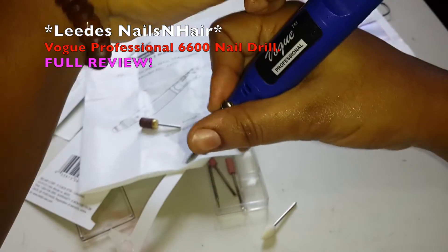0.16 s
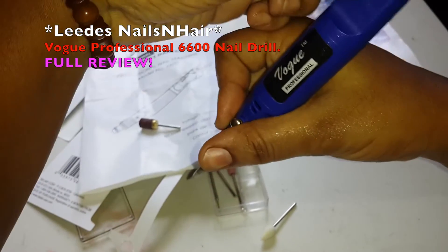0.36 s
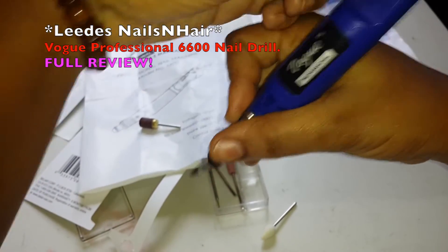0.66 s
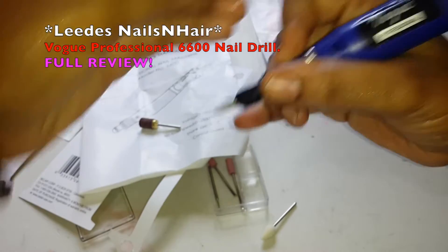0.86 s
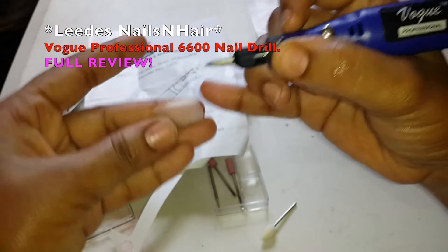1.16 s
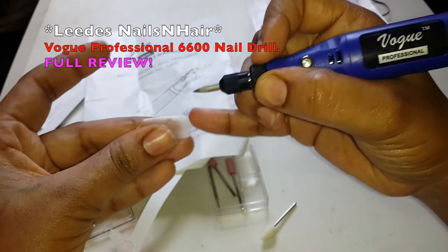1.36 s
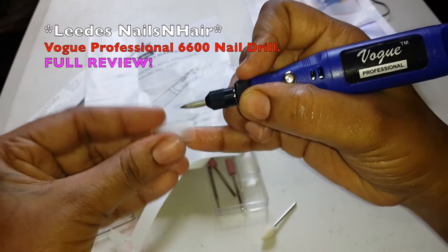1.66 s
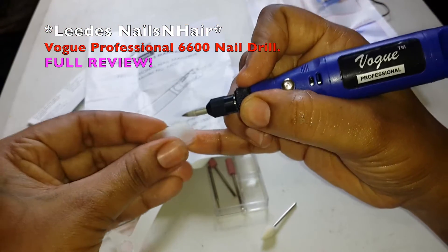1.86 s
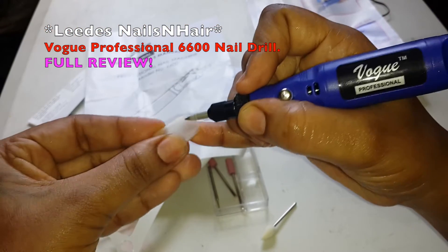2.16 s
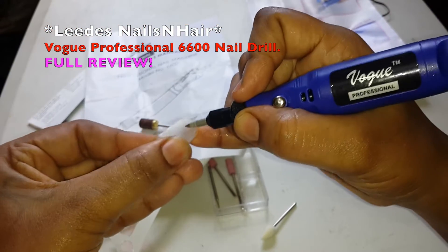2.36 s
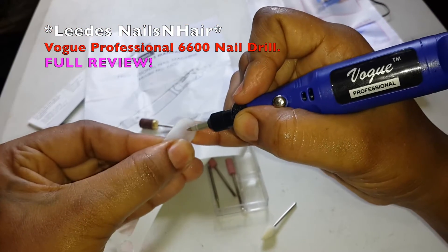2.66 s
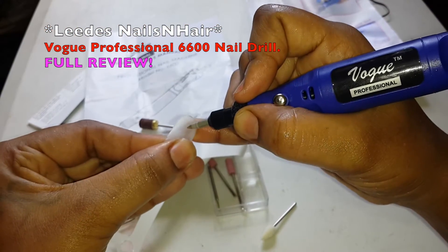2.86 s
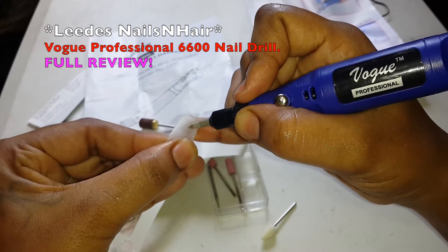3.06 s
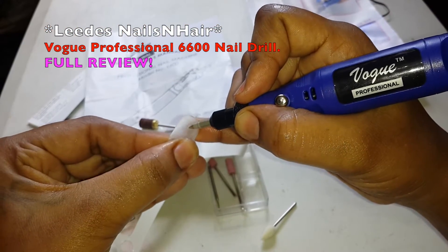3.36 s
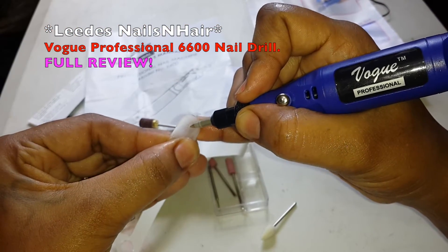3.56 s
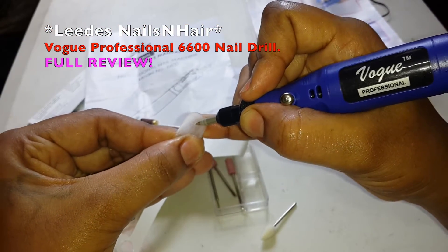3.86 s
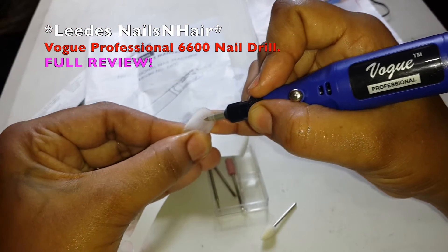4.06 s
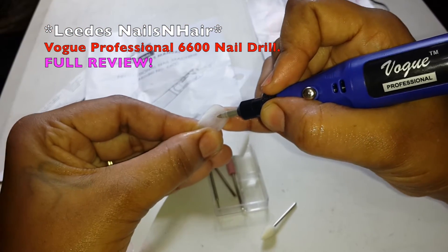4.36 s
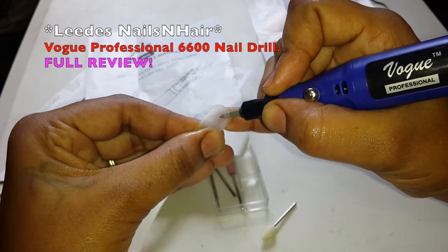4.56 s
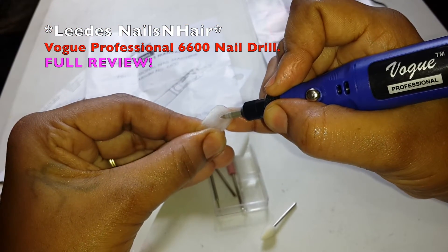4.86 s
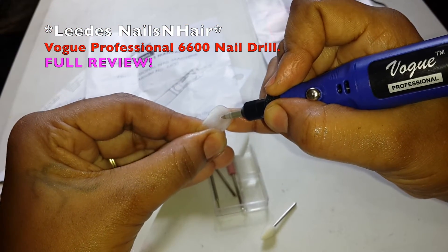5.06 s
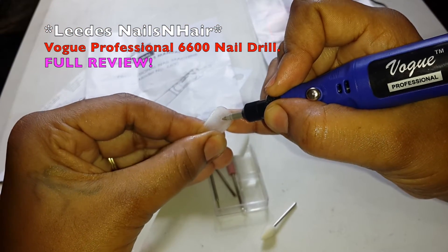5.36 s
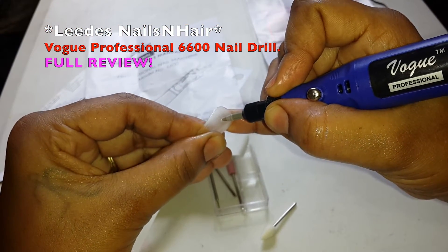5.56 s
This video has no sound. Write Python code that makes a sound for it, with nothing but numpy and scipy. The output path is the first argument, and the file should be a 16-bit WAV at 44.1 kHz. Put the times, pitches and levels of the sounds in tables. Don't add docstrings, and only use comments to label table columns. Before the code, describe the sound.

A small electric nail drill held close to the microphone in a quiet room. It starts as a low, weak plastic buzz, swoops up in pitch after half a second, and then runs steadily as a loud, bright, raspy whine. The loose chuck chatters in uneven bursts with a metallic ring as the bit grinds a plastic nail tip. Stereo, slightly to the right, with very little bass.

```python
import sys
import numpy as np
from scipy import signal
from scipy.fft import rfft, irfft, next_fast_len
from scipy.io import wavfile
from scipy.ndimage import map_coordinates

SR = 44100
rng = np.random.default_rng(int(sys.argv[2]) if len(sys.argv) > 2 else 0)


def amplitude_ratio(level_db):
    exponent = np.asarray(level_db, float) / 20
    return 10 ** exponent


def materialize(psi):
    bounded = np.clip(np.atleast_2d(psi).T, -1, 1)
    quanta = np.round(bounded * 32767).astype(np.int16)
    wavfile.write(sys.argv[1], SR, quanta)


N = 251370
T = np.arange(N) / SR

# (t/s, f/Hz)
SHAFT_SPEED = [(0, 65.45), (.47, 65.45), (.55, 78.8), (.6, 87.2), (.65, 91.3), (.75, 95.8), (.85, 102),
               (.9, 102.25), (3.1, 102.25), (3.5, 101.8), (3.9, 101.2), (4.9, 101.22), (5.7, 101.07)]
# (t/s, left-right level/dB)
HAND_PLACE = [(0.0, -4), (0.24, -2), (1.17, -4.5), (2.14, -2.5), (2.43, -4), (3.25, -5), (3.78, -5.5),
              (4.65, -6), (4.9, -5.5), (5.7, -5.5)]
# (slow level/dB, fast level/dB, change at full pressure/dB)
RATTLE_DB, TIP_DB = (-35.5, -29.5, -0.51), (-67, -37, -19)
# (start t/s, length t/s, bit tip level/dB, chuck level/dB)
HARD_SPELLS = [(0.335, 0.22, -34, -40), (0.625, 0.32, -34.5, -35), (0.916, 0.14, -35, -15),
               (1.097, 0.21, -32, -47), (1.353, 0.1, -31, -13), (1.67, 0.46, -38, -22),
               (2.14, 0.047, -34, -28), (2.184, 0.3, -32, -9.5), (2.57, 0.033, -31.5, -8),
               (2.618, 0.18, -30, -10.5), (2.793, 0.055, -36, -30), (3.055, 0.076, -31, -8),
               (3.284, 0.053, -41, -16), (3.38, 0.072, -32, -10), (3.611, 0.137, -27.5, -11),
               (3.777, 0.15, -28.5, -11.5), (4.016, 0.091, -27.5, -35), (4.15, 0.13, -25, -31),
               (4.32, 0.12, -26.5, -37), (4.482, 0.054, -27, -44), (4.577, 0.11, -38, -40),
               (5.56, 0.072, -34, -16)]


def drill():
    shaft_hz = curves(SHAFT_SPEED)[0]
    rattle_db = state(*RATTLE_DB) + 0.32 * wobble(8, T)
    tip_db = spells(state(*TIP_DB) + wobble(9.1, T), HARD_SPELLS)
    tied = housing_rattle(shaft_hz, rattle_db) + chuck_knocks(shaft_hz)
    tied = tied + bit_knocks(shaft_hz, tip_db) + sleeve_knocks(shaft_hz)
    hiss_db = rattle_db + 0.019 * (tip_db + 65) + 2.5
    tied = tied + amplitude_ratio(hiss_db) * brush_hiss(shaft_hz)
    return tied * amplitude_ratio(np.outer([.5, -.5], curves(HAND_PLACE)[0] + 4.5))


# (f/Hz, width f/Hz, level/dB)
HOUSING_MODES = [(1375, 189, 8.5), (1903, 370, 2.5), (2126, 116, 7), (2410, 400, 1), (2934, 1090, -2),
                 (3630, 415, 0), (4360, 840, -4.5), (5950, 1350, 0.5), (6490, 1720, -2.5), (8030, 720, -7),
                 (9470, 680, -13.5), (12900, 1300, -50)]
BELLY_TOP_HZ, BELLY_SHARE_DB = 1750, (-11, -7, 0)
STRAIN_TOP_HZ = 2800


def housing_rattle(shaft_hz, rattle_db):
    def shell(hz):
        bass_loss = (1j * hz / (1j * hz + 1300)) ** 5
        return modes(HOUSING_MODES, order=1)(hz) * bass_loss

    both, left, right = (contacts(shaft_hz) for _ in range(3))
    led = knocks(shaft_hz, [(0, 0.9), (.13, 0.66)], 1, 5e-6, 1.0)
    rattle = led + both + 0.6 * np.array([left, right])
    body = unit(filtered(rattle, shell))
    body = body + (amplitude_ratio(state(*BELLY_SHARE_DB)) - 1) * filtered(body, below(BELLY_TOP_HZ))
    low = filtered(body, below(STRAIN_TOP_HZ))
    return amplitude_ratio(rattle_db + 6.5) * (body + (amplitude_ratio(0.74 * strain()) - 1) * low)


# (t/s, beats)
WHIRL_CREEP = [(0, -18.6), (.85, -18.4), (2.12, -15), (2.52, -14), (2.85, -13), (3.2, -12), (3.38, -11),
               (3.78, -9), (4.07, -7), (4.4, -5), (5.07, 0), (5.7, 4.6)]
CREEP_S, CREEP_SPREAD = 0.00025, 0.19
HURRY_FROM_S, HURRY = 4.4, 2


def contacts(shaft_hz):
    turns, count = np.cumsum(shaft_hz) / SR, np.arange(1200)
    angles, signs = rng.uniform(size=9), rng.choice([-1, 1], size=9)
    times, sizes = [], []
    for angle, sign in zip(angles, signs):
        s = np.interp(count / 2 + angle, turns, T, right=N)
        beats = np.interp(s, *np.transpose(WHIRL_CREEP)) + CREEP_SPREAD * rng.standard_normal()
        time_chance, size_chance = rng.standard_normal((2, len(s)))
        pace = s + HURRY * np.clip(s - HURRY_FROM_S, 0, None)
        hard = np.cos(np.pi * (count + beats - .5) / 2) ** 2
        jitter = (3e-6 + slip(shaft_hz, s)) * time_chance
        times.append(s - CREEP_S * (beats % 1) + 7e-5 * wobble(3, pace) + jitter)
        sizes.append(sign * hard * amplitude_ratio(2 * wobble(3, pace) + size_chance))
    return pulses(np.concatenate(times), np.concatenate(sizes))


# (f/Hz, width f/Hz, level/dB)
CHUCK_MODES = [(4330, 970, 10), (4950, 350, 8)]
SHANK_MODES = [(5953, 480, 1)]
COLLAR_MODES = [(3610, 480, 0)]
# (slow level/dB, fast level/dB, change at full pressure/dB)
CHUCK_DB, SHANK_DB, COLLAR_DB = (-72, -12, -17), (-68, -33, -10.5), (-78, -49.5, 7)
# (start t/s, length t/s, shank level/dB, collar level/dB)
SINGING_SPELLS = [(.55, 0.32, -39, -43), (1.06, 0.055, -31, -38), (1.15, 0.18, -38, -34),
                  (1.374, 0.3, -32, -45), (1.658, 0.27, -39, -34.5), (2.203, 0.25, -32, -54),
                  (2.687, 0.12, -34, -43), (2.834, 0.214, -43, -33.5), (3.2, 0.17, -45, -33),
                  (3.478, 0.12, -46, -25.5), (3.666, 0.19, -27, -30.5), (3.857, 0.088, -40, -27),
                  (3.95, 0.15, -26.5, -30.5), (4.107, 0.15, -28, -28.5), (4.285, 0.12, -23.5, -32),
                  (4.454, 0.035, -24, -44), (4.57, 0.08, -29, -33)]


def chuck_knocks(shaft_hz):
    train = knocks(shaft_hz, [(0, 1), (.05, -.15)], 1, 6e-6, 1.5)
    chuck_db = spells(state(*CHUCK_DB) + 0.58 * wobble(28, T), HARD_SPELLS, column=3)
    shank_db = spells(state(*SHANK_DB) + 0.72 * wobble(2.5, T), SINGING_SPELLS)
    collar_db = spells(state(*COLLAR_DB), SINGING_SPELLS, column=3)
    chuck = struck(train, CHUCK_MODES, chuck_db - 16.5)
    shank = struck(-train, SHANK_MODES, shank_db)
    return chuck + shank + struck(-train, COLLAR_MODES, collar_db)


# (f/Hz, width f/Hz, level/dB)
TIP_MODES = [(6490, 1150, 9.5), (8940, 420, 3)]
CRACK_MODES = [(11900, 3500, 0)]


def bit_knocks(shaft_hz, tip_db):
    train = knocks(shaft_hz, [(0, 1), (.07, .2), (.16, .2)], .7, 8e-6, 1.5, column=2)
    crack_db = tip_db + 10.5 - 25.5
    return struck(train, TIP_MODES, tip_db + 2.5) + struck(train, CRACK_MODES, crack_db)


# (f/Hz, width f/Hz, level/dB)
SLEEVE_MODES = [(2315, 750, 0.5), (2674, 1290, 3), (4730, 580, -3)]
# (start t/s, length t/s, level/dB)
LOOSE_SPELLS = [
    (0.127, 0.25, -34.5),
    (0.55, 0.29, -32.5),
    (1.1, 0.11, -69),
    (1.883, 0.41, -32.5),
    (2.453, 0.2, -32),
    (3.24, 0.097, -27.5),
    (3.492, .08, -26.5),
    (3.638, 0.083, -27),
    (3.812, 0.057, -27),
]


def sleeve_knocks(shaft_hz):
    train = knocks(shaft_hz, [(-.02, 1), (.15, -.35), (.3, .2)], 1, 8e-6, 1.5)
    sleeve_db = spells(state(-58, -30.5, -9.5) + 2.0 * wobble(8, T), LOOSE_SPELLS)
    return struck(train, SLEEVE_MODES, sleeve_db - 2.0)


# (start t/s, length t/s,
# the bit's length t/s, angle in double turns, slide in double turns per s)
KNOCK_RUNS = [(0, .5, .5, .87, 0), (.05, .4, .1, .4, 0), (.55, .28, .25, .94, 0), (.6, .24, .1, .17, -.6),
              (.88, .4, .3, .35, .22), (.9, .7, .55, .9, .2), (1.28, .82, .8, .37, .14),
              (1.64, .83, .6, .93, .22), (2.13, .67, .5, .41, .24), (2.56, .58, .5, .92, .27),
              (2.95, .3, .2, .42, .3), (3.27, .25, .2, .92, .3), (3.58, .17, .16, .42, .2),
              (3.74, .16, .2, .93, .2), (3.93, .16, .16, .43, .2), (4.1, .16, .16, .94, .2),
              (4.27, .19, .19, .43, .2), (4.45, .12, .07, .93, .2)]
QUICK_FROM_S, QUICK_EVERY_S, QUICK_ANGLE = 4.55, .13, .42
RUN_EDGE_S, RUN_FADE_S = .012, .035
FAST_HZ = 102.4
FINGERS_S, FINGERS_GAIN = .003, .08


def knocks(shaft_hz, bounces, slide, jitter_s, scatter_db, column=1):
    turns, count = np.cumsum(shaft_hz) / SR, np.arange(600)
    quick = [(QUICK_FROM_S + k * QUICK_EVERY_S, .14, .12, QUICK_ANGLE + k % 2 / 2, .2) for k in range(9)]
    times, sizes = [], []
    for row in KNOCK_RUNS + quick:
        start, angle, slide_rate = row[0], row[3], row[4]
        for late, size in bounces:
            s = np.interp(count + angle + late, turns, T, right=N)
            age = s - start
            time_chance, size_chance = rng.standard_normal((2, len(s)))
            alive = np.clip(age / RUN_EDGE_S, 0, 1) * np.clip((row[column] - age) / RUN_FADE_S, 0, 1)
            wander = 1.5e-5 * wobble(5, s) + (jitter_s + slip(shaft_hz, s)) * time_chance
            times.append(s - slide * slide_rate * age / FAST_HZ + wander)
            sizes.append(size * alive * amplitude_ratio(0.23 * wobble(5.93, s) + scatter_db * size_chance))
    delays = rng.uniform(size=(2, 6, 1)) * FINGERS_S
    shares = rng.standard_normal((2, 6, 1)) * FINGERS_GAIN

    def fingers(hz):
        return 1 + np.sum(shares * np.exp(-2j * np.pi * hz * delays), axis=1)

    return filtered(pulses(np.concatenate(times), np.concatenate(sizes)), fingers)


def slip(shaft_hz, s):
    run_up = np.interp(s, T, np.gradient(shaft_hz) * SR)
    return 7e-7 * np.clip(run_up - 95, 0, None)


# (f/Hz, level/dB per Hz)
BRUSH_COLOUR = [(180, -84), (300, -35), (600, -20.5), (1050, -21.5), (1390, -6.5), (1730, -6), (2180, 0.5),
                (2880, 0.5), (3640, 5.5), (5320, 5.5), (15600, -15)]


def brush_hiss(shaft_hz):
    gate = amplitude_ratio(3.6 * np.cos(4 * np.pi * np.cumsum(shaft_hz) / SR))
    noise = rng.standard_normal((3, N))
    return unit(filtered(gate * (noise[0] + 1.85 * noise[1:]), colour(BRUSH_COLOUR)))


# (order, beats added, slow level/dB, fast level/dB, full pressure change/dB, flutter/dB)
STRONG_LINES = [(2, 0.027, -66.5, -52.5, 9, 1.5), (6, 0.025, -66, -49.5, -5.5, 1.5),
                (7, 0.41, -54, -48, -6, 0), (12, 0.513, -65, -52.5, -16, 10), (12, 0.016, -67, -49, -6, 1)]
# (beats added, slow level/dB, fast level/dB, full pressure change/dB)
POLE_LINES = [(0.12, -64.5, -71.5, 1.5), (.5, -68, -62, 2), (0, -62, -60.5, -3.5), (0.494, -65, -57.5, 3.5),
              (0.017, -52.5, -53, -7), (0.489, -69, -57.5, 0), (0.1, -63.5, -53.5, 17), (0, -72, -55, 9)]
POLE_LINE_ORDERS = 4, 5, 8, 9, 10, 11, 16, 24
ODD_SWELL = (1.06, 1.08, 4)


def hum():
    angle = 2 * np.pi * np.cumsum(curves(SHAFT_SPEED)[0]) / SR
    whirl = 2 * np.pi * curves(WHIRL_CREEP)[0]
    strong, weak = 0, 0
    for k, beats, *db, flutter_db in STRONG_LINES:
        if k % 2:
            lift_db = 0.38 * strain() + spells(0, [ODD_SWELL])
        else:
            lift_db = k / 10 * strain()
        level = amplitude_ratio(state(*db) + lift_db + flutter_db * wobble(7, T))
        strong = strong + level * np.sin(k * angle + beats * whirl + k)
    for k, (beats, *db) in zip(POLE_LINE_ORDERS, POLE_LINES):
        level = amplitude_ratio(state(*db) + 3.95 * wobble(6.14, T))
        weak = weak + level * np.sin(k * angle + beats * whirl + k)
    return strong + amplitude_ratio(0.88 * strain()) * weak


def strain():
    return np.clip(spells(-21.5, [(0.54, 0.37, 0)]) / 20 + 1, 0, 1) * 3.5


# (slow level/dB, fast level/dB, full pressure change/dB)
BELLY_LINES = [(-23, -15.5, -4), (-18, -10, 5), (-24, -11.5, 2), (-16.5, 0, 4), (-19, -15, 14.5),
               (-21, -10.5, -16), (-23, -12, 4.5), (-15, -7, 9.5), (-2, -8, -3), (-4.5, -9, -1.5),
               (-4, -6.5, 0), (4, -10.5, -4), (-17, -5, -6), (-1, -11, -5), (-10, -15, -1), (-2, -28, -5),
               (3, -33, 0), (0, -30, -8)]
BELLY_LINE_ORDERS = 10, 12, 13, 14, 15, 16, 17, 18, 20, 22, 23, 24, 25, 26, 27, 38, 39, 40
# (start t/s, length t/s, level/dB)
DRONE_SPELLS = [(.53, 0.063, -43), (0.593, 0.26, -34), (1.24, 0.15, -37), (1.585, 0.35, -39),
                (2.07, 0.084, -34.5), (2.466, 0.1, -34), (2.805, 0.21, -33.5), (3.21, 0.082, -34.5),
                (3.49, 0.077, -43), (3.9, 0.074, -38), (4.08, 0.044, -39), (4.243, 0.035, -43),
                (4.517, 0.045, -39), (4.648, 0.061, -39)]


def belly():
    angle = 2 * np.pi * np.cumsum(curves(SHAFT_SPEED)[0]) / SR
    whirl = np.pi * curves(WHIRL_CREEP)[0]
    lines = 0
    for k, db in zip(BELLY_LINE_ORDERS, BELLY_LINES):
        phase = k * angle + k % 2 * whirl + k * k / 4 + 0.71 * wobble(6, T)
        lines = lines + amplitude_ratio(state(*db) + 2.7 * wobble(9, T)) * np.sin(phase)
    return amplitude_ratio(spells(state(-45, -45, 4), DRONE_SPELLS)) * lines


# (t/s, peak level/dB, f/Hz)
FINGER_TAPS = [
    (0.867, -33, 319),
    (2.091, -45, 522),
    (2.832, -46, 307),
    (3.36, -49, 545),
]


def bumps():
    out, t = np.zeros(N + SR), np.arange(SR // 10) / SR
    for s, db, hz in FINGER_TAPS:
        ring = np.sin(2 * np.pi * hz * t)
        ring += 0.6 * np.sin(2 * np.pi * 1.3 * hz * t)
        ring += 0.25 * np.sin(2 * np.pi * 2.2 * hz * t)
        out[round(s * SR):][:len(t)] += amplitude_ratio(db - 60 * t / 0.13) * (1 - np.exp(-t / 0.004)) * ring
    return out[:N]


# (f/Hz, t60 t/s)
ROOM_DECAY = [(300, 1), (3000, 1), (12000, 0.024)]


def room(x):
    hz, t, z = signal.stft(rng.standard_normal((2, SR // 3)), SR, nperseg=256)
    z = z * amplitude_ratio(-60 * t / along(ROOM_DECAY, hz)[:, None]) * (hz > 400)[:, None]
    tail = signal.istft(z, SR, nperseg=256)[1]
    tail = tail / np.linalg.norm(tail[0])
    return signal.fftconvolve(np.pad(x, (60, 0))[None], tail, axes=1)[:, :N]


# (f/Hz, level/dB per Hz)
RUMBLE_COLOUR = [(15, -30), (30, -16), (50, -2), (62, -12), (130, -6.5), (200, -4), (300, -13.5),
                 (500, -120)]
AIR_COLOUR = [(100, -50), (200, 0), (280, -0.5), (450, -4), (900, -9), (1500, -1), (2500, -120)]
# (start t/s, length t/s, level/dB)
HAND_SHUFFLES = [
    (1.106, 0.13, -61),
    (2.75, 0.077, -61),
    (3.1, 0.065, -58),
    (4.057, 0.085, -57),
    (4.55, 0.28, -55.5),
]
# (start t/s, length t/s, level/dB)
AIR_STIRS = [
    (0, 0.25, -56.5),
    (1.023, 0.14, -60),
    (2.76, 0.13, -56),
    (4.094, 0.87, -63),
]


def air():
    rumble_db = spells(state(-70, -68.5, 10), HAND_SHUFFLES)
    air_db = spells(-59, AIR_STIRS)
    out = 0
    for spectrum, db, apart in (RUMBLE_COLOUR, rumble_db, .22), (AIR_COLOUR, air_db, .7):
        noise = rng.standard_normal((3, N))
        bed = unit(filtered(noise[0] + apart * noise[1:], colour(spectrum)))
        out = out + amplitude_ratio(db + 1.5 + 1.3 * wobble(8.2, T)) * bed
    return out


# (t/s, pressure on the nail 0-1)
GRIP_PRESSURE = [(0, 0.48), (1.9, 0.12), (2.5, 0.16), (3.3, 0.25), (4.0, 0.48), (4.5, 0.6), (5.0, 0.98),
                 (5.7, 1)]


def state(slow_db, fast_db, pressed_db):
    fast = np.clip((curves(SHAFT_SPEED)[0] - 65.5) / (FAST_HZ - 65.5), 0, 1)
    return slow_db + fast ** 2 * (fast_db - slow_db) + pressed_db * np.clip(curves(GRIP_PRESSURE)[0], 0, 1)


def spells(steady_db, rows, column=2):
    def rise(s):
        return np.clip((T - s) / .022 + .5, 0, 1)

    extra = sum(amplitude_ratio(row[column]) * rise(row[0]) * (1 - rise(row[0] + row[1])) for row in rows)
    return 10 * np.log10(amplitude_ratio(steady_db) ** 2 + extra ** 2)


def unit(x):
    return x / np.sqrt(np.mean(x ** 2) + 1e-20)


def along(points, hz):
    f, v = np.transpose(points)
    return np.interp(np.log(hz + 1), np.log(f + 1), v)


def curves(rows):
    s, *cols = np.transpose(rows)
    return [np.interp(T, s, c) for c in cols]


def wobble(rate, at):
    return map_coordinates(rng.standard_normal(200), [np.clip(at * rate + 2, 0, 198)])


def filtered(x, response):
    m = next_fast_len(N + SR // 2)
    return irfft(rfft(x, m) * response(np.fft.rfftfreq(m, 1 / SR)), m)[..., :N]


def below(edge_hz):
    return lambda hz: 1 / (1 + (hz / edge_hz) ** 8)


def colour(points):
    return lambda hz: amplitude_ratio(along(points, hz))


def modes(rows, order=2):
    def response(f):
        total = 0
        for k, (centre, width, db) in enumerate(rows):
            loss = 1j * f * width
            total = total + (-1) ** k * amplitude_ratio(db) * loss / (centre * centre - f * f + loss)
        return total ** order
    return response


def struck(train, body, db):
    return amplitude_ratio(db) * unit(filtered(train, modes(body)))


def pulses(seconds, sizes):
    at = np.clip(seconds * SR, 8, N + 8)[:, None]
    index = np.floor(at).astype(int) + np.arange(-7, 9)
    shape = np.sinc(index - at) * np.cos(np.pi * (index - at) / 16) ** 2
    return np.bincount(index.ravel(), (sizes[:, None] * shape).ravel(), N + 32)[:N]


# (f/Hz, radians left leads)
PORT_TILT = [(60, 0.0), (110, 10), (200, 1), (380, -2), (700, -5.5), (1290, -2.5), (2380, 0.5), (4400, -5),
             (8120, 2.5), (15000, 12.5)]
PORT_LEAD = [(250, 0.12), (340, 0.8), (690, -1.68), (1030, -1.4), (1550, -0.9), (1980, -1), (2840, 1),
             (3300, 1.05), (5250, 1.64), (8180, 1.17), (15000, 3)]
TABLE_S, TABLE_GAIN = 0.000657, (-0.091, -0.056)


def scene():
    def ports(hz):
        tilt, lead = along(PORT_TILT, hz), along(PORT_LEAD, hz)
        return np.array([amplitude_ratio(k * tilt) * np.exp(1j * k * lead) for k in (.5, -.5)])

    def table(hz):
        shadow = 1 - 0.44 * modes([(2950, 290, 0)], order=1)(hz)
        return shadow * (1 + np.outer(TABLE_GAIN, np.exp(-2j * np.pi * hz * TABLE_S)))

    tool = drill()
    direct = filtered(filtered(tool, table) + hum() + belly(), ports)
    return direct + amplitude_ratio(-15) * room(tool.mean(0)) + bumps() + air()


def roll_off(x):
    return signal.sosfilt(signal.butter(12, 15710, fs=SR, output="sos"), x)


def record(dry):
    soft = dry / (1 + np.abs(dry / .72) ** 4) ** .25
    mix = filtered(soft, lambda hz: hz < 15550)
    return roll_off(mix)


dry = scene()
out = record(dry)
materialize(out)
```